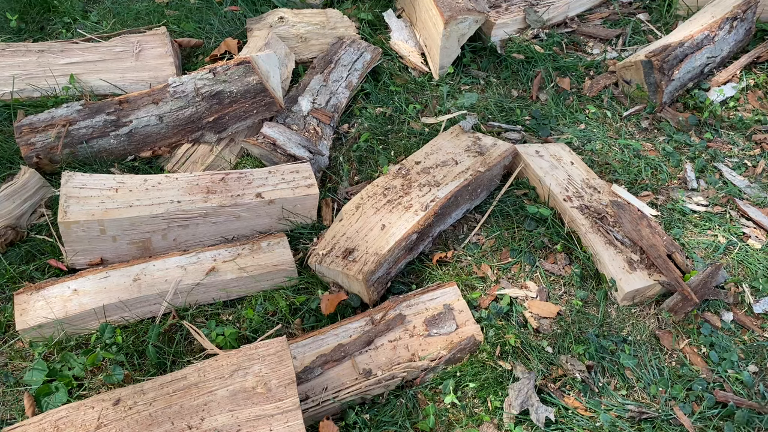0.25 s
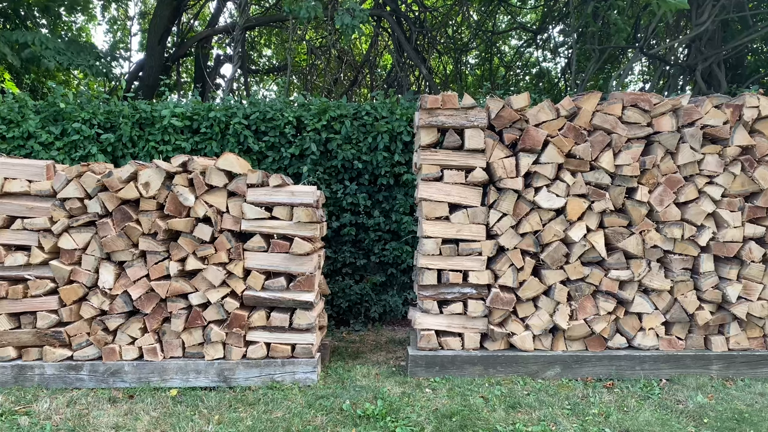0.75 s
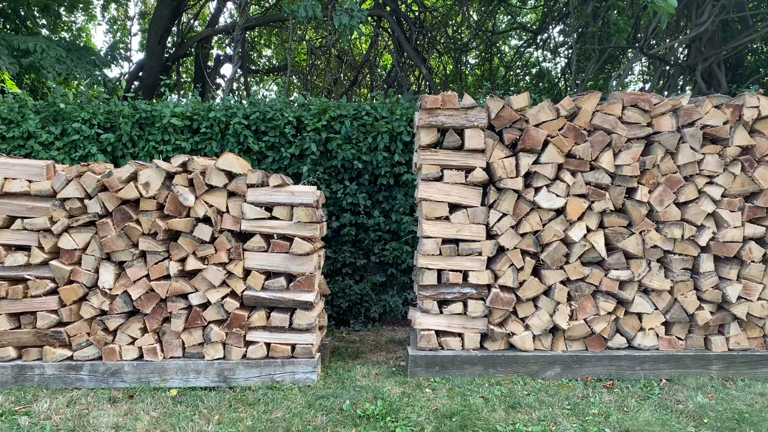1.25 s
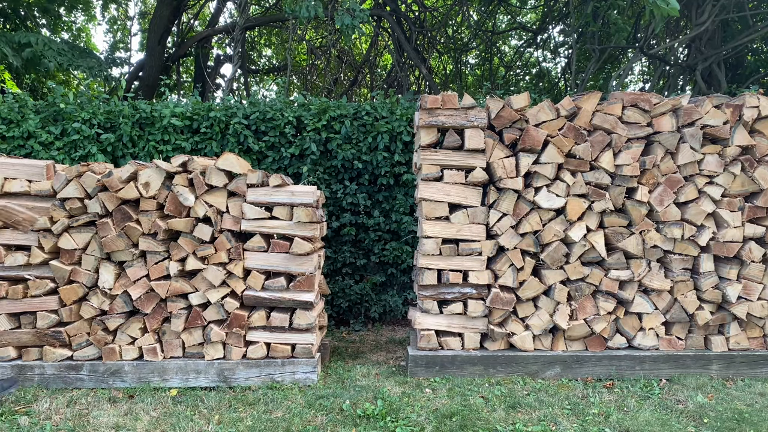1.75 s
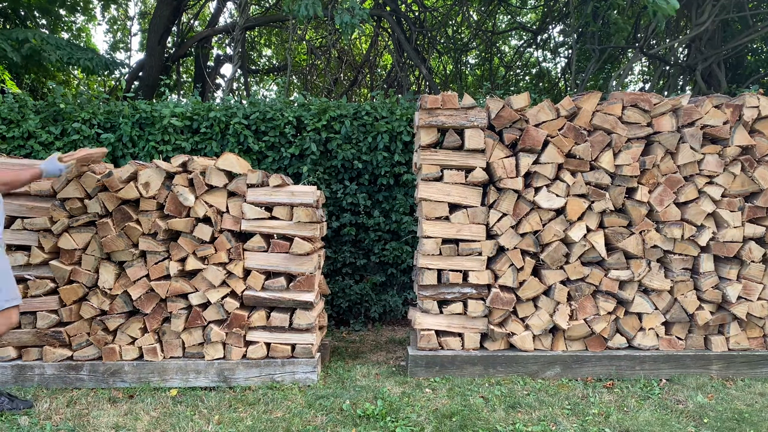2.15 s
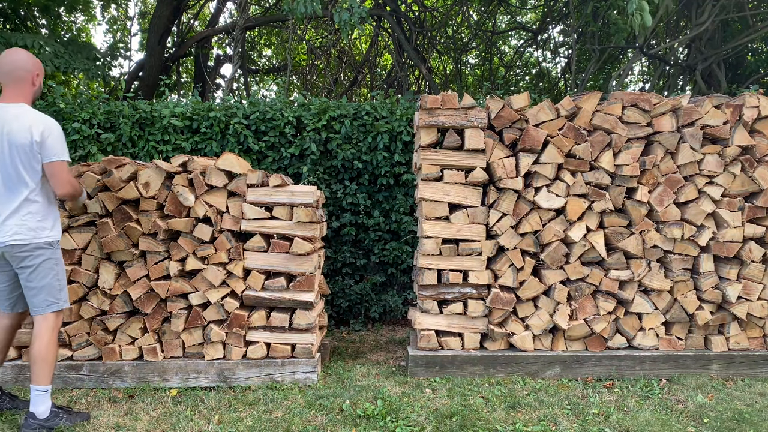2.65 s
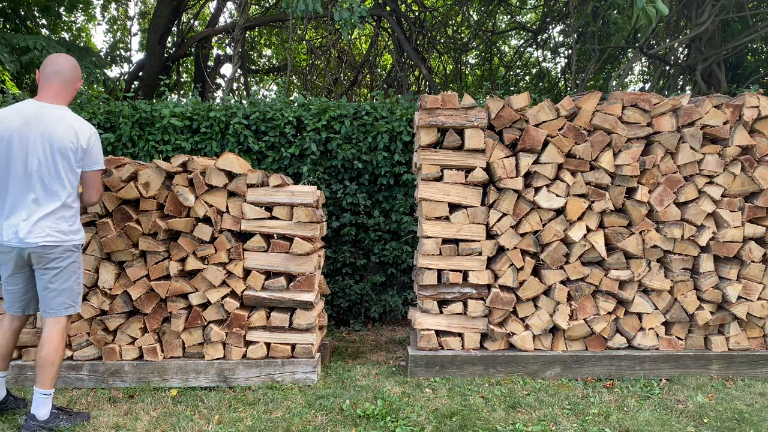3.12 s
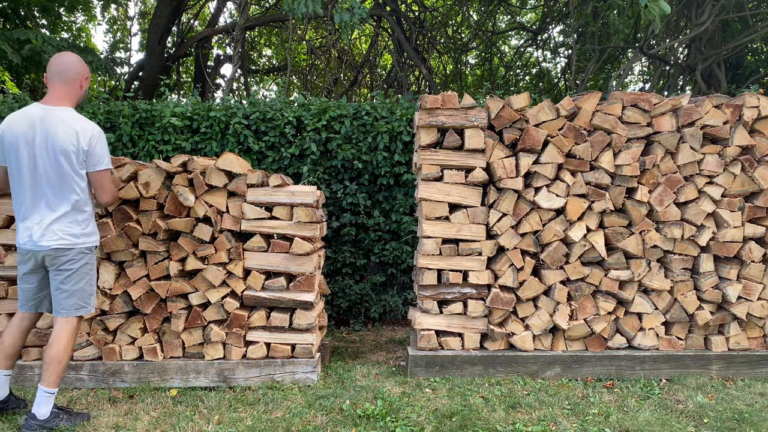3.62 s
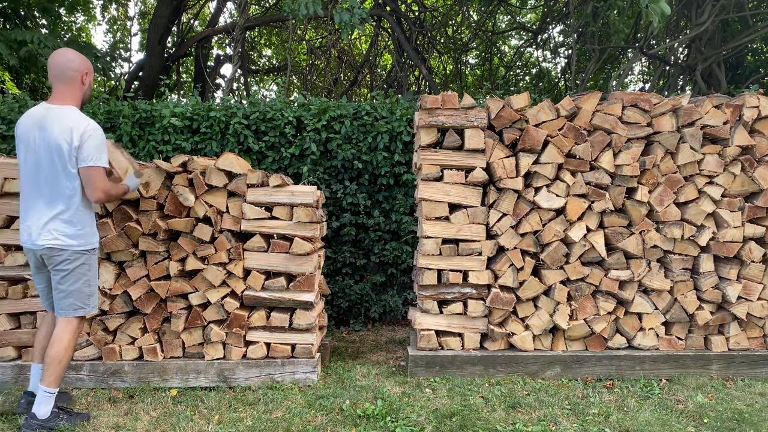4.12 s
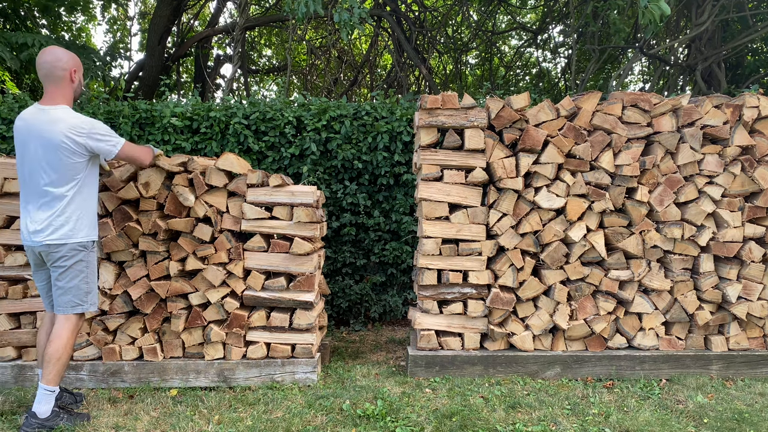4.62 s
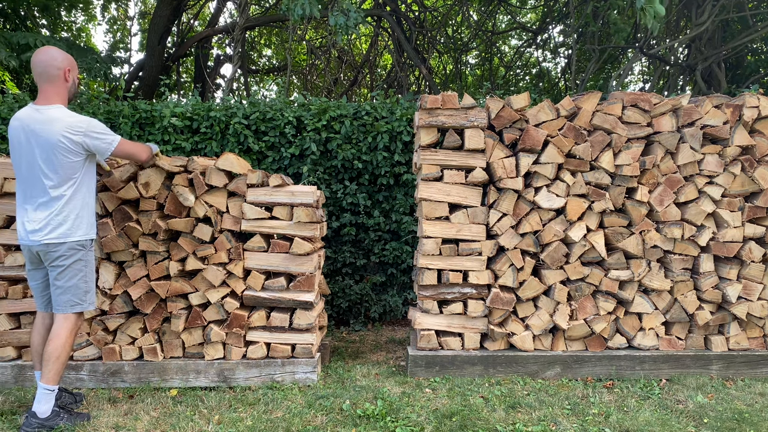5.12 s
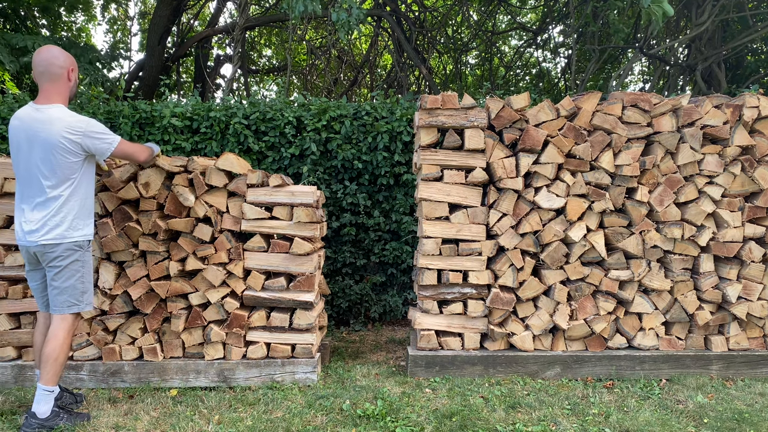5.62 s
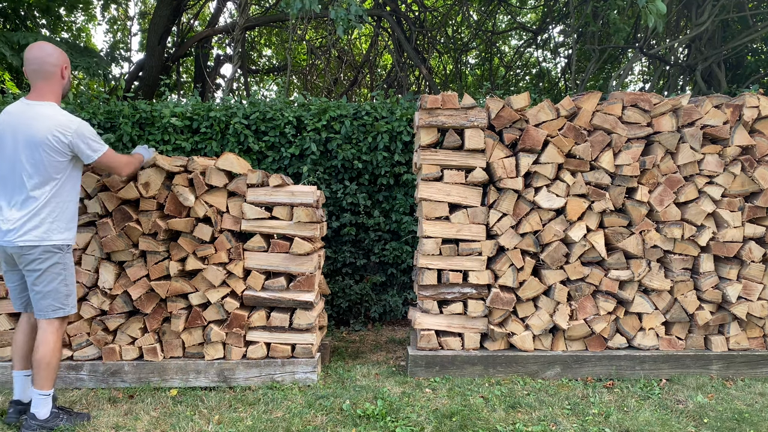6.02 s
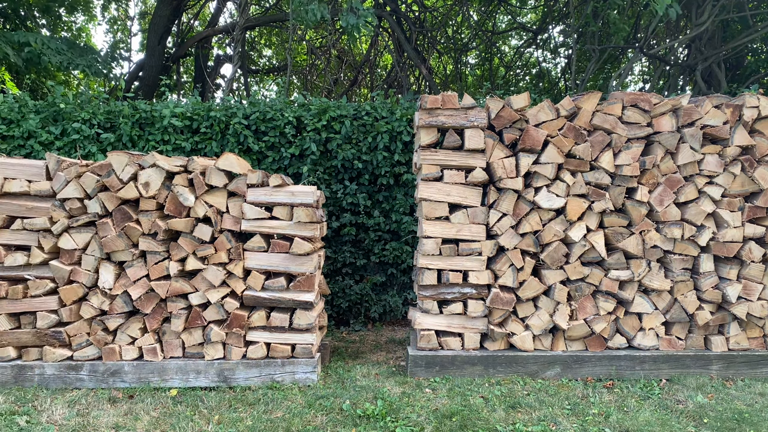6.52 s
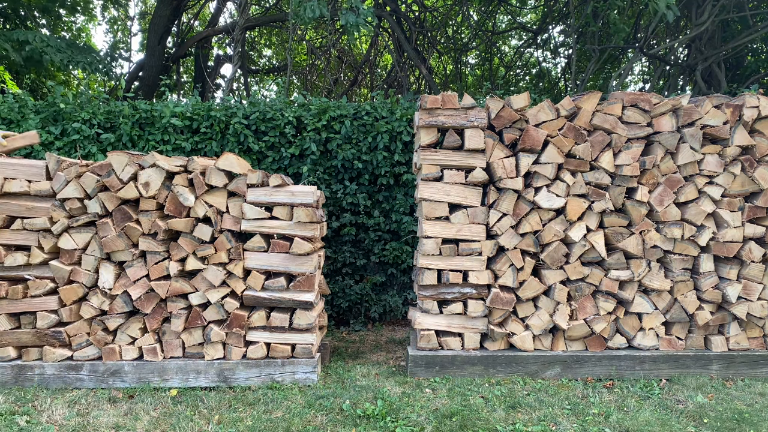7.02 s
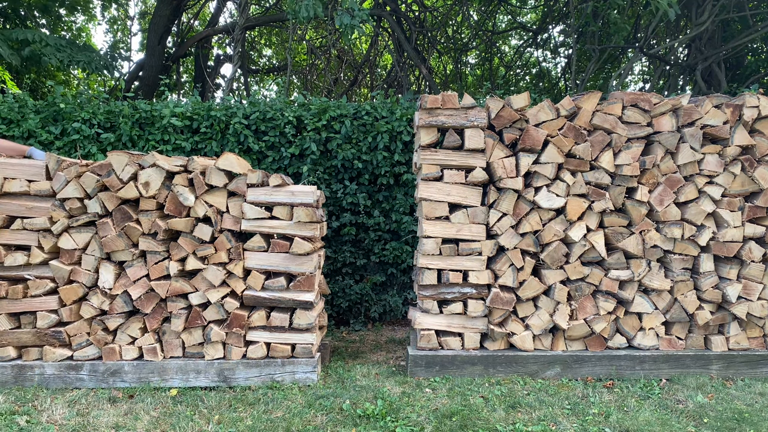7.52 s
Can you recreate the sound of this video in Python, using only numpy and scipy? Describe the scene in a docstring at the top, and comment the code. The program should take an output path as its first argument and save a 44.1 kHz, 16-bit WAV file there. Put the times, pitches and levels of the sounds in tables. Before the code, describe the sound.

Dull bumps and rubbing sound right at the microphone. A quiet garden follows, with crickets chirping, a far engine droning, traffic passing in the distance and a bird giving thin, falling cries. A split log taps onto a woodpile, and later another lands with a sharper knock and a small clatter. The insects and background rumble then grow louder, and a quick run of deep thuds comes near the end.

```python
"""A late-summer garden where firewood is stacked, heard in three stretches joined by short fades.
First come dull bumps and rubbing close to the microphone, then split logs that ring briefly as they
knock onto the stack, then low thuds. Behind it all, insects chirp and buzz with their wings, leaves
stir, a bird gives falling cries, a far engine drones and distant traffic rushes by."""
import sys
import numpy as np
from scipy import signal
from scipy.fft import rfft, irfft, next_fast_len
from scipy.io import wavfile
from scipy.ndimage import uniform_filter1d, map_coordinates

SR = 44100
rng = np.random.default_rng(int(sys.argv[2]) if len(sys.argv) > 2 else 0)


def waveform_to_disk(signal):
    """Save audio, clipped to [-1, 1], as 16-bit WAV at the path in sys.argv[1]."""
    frames = np.transpose(np.atleast_2d(signal))
    scaled = np.clip(frames, -1, 1) * 32767
    samples = np.round(scaled).astype(np.int16)
    wavfile.write(sys.argv[1], SR, samples)


N = 342127
T = np.arange(N) / SR

# the joins between the stretches: t/s, fade-out/s, fade-in/s
JOINS = [(0.555, 0.042, 0.035), (6.12, 0.042, 0.17)]
# tone colour of tyres roaring on a road: f/Hz, level/dB
TYRE_ROAR = [(300, -30), (550, -9.5), (800, -2.5), (1050, 2.5), (1400, -6), (2000, -48), (3500, -69)]


def amp(db):
    """Turn decibels into a factor to multiply by."""
    return 10 ** (np.asarray(db) / 20)


def unit(x):
    """Scale a sound to an average strength (rms) of 1."""
    return x / np.sqrt(np.mean(x ** 2) + 1e-20)


def along(points, hz):
    """Read between (frequency, value) points, with octaves evenly spaced."""
    f, v = np.transpose(points)
    return np.interp(np.log(hz + 1), np.log(f + 1), v)


def wobble(rate):
    """A smooth curve through `rate` random values a second."""
    return map_coordinates(rng.standard_normal(int(N * rate / SR) + 4), [T * rate])


def swell(s, rise, hold, release):
    """A curve that rises from 0 to 1 at time s, holds, then falls back."""
    return np.clip(np.minimum((T - s) / rise, 1 - (T - s - rise - hold) / release), 0, 1)


def stretch():
    """Which stretch (0, 1 or 2) each sample belongs to."""
    return np.searchsorted([join[0] for join in JOINS], T)


def add(track, s, sound):
    """Mix a sound into a track at time s."""
    part = track[..., max(round(s * SR), 0):][..., :sound.shape[-1]]
    part += sound[..., :part.shape[-1]]


def filtered(x, response):
    """Change the strength and timing of each frequency in x by response(hz)."""
    size = next_fast_len(x.shape[-1] + 8192)
    return irfft(rfft(x, size) * response(np.fft.rfftfreq(size, 1 / SR)), size)[..., :x.shape[-1]]


def placed(x, lead_ms, pan_db=0):
    """A sound from the left reaches the left channel earlier and louder."""
    side = np.array([[.5], [-.5]])
    return amp(side * pan_db) * filtered(x, lambda hz: np.exp(2j * np.pi * hz * lead_ms / 1000 * side))


def rush(colour, alike, patchy_db=1):
    """Stereo noise of strength 1 with louder and softer patches; alike=1 makes both sides the same."""
    noise = signal.stft(rng.standard_normal((2, N)), nperseg=512)[2]
    patches = uniform_filter1d(rng.standard_normal(noise.shape[1:]), size=5, axis=0)
    patches = uniform_filter1d(patches, size=14, axis=1)
    pair = signal.istft(noise * amp(patchy_db * unit(patches)), nperseg=512)[1][:, :N]
    mid, side = filtered(pair, lambda hz: amp(along(colour, hz)))
    turn = np.arccos(np.clip(alike, -1, 1)) / 2
    return unit(np.cos(turn) * mid + np.sin(turn) * np.array([side, -side]))


def echo(x):
    """Hedge, trees and woodpile scatter a sound into a short, soft tail."""
    # how long the garden echoes: f/Hz, time to fade by 60 dB/s
    fade_times = [(200, 0.51), (1000, 0.37), (4000, 0.69), (12000, 0.032)]
    hz, t, noise = signal.stft(rng.standard_normal((2, SR // 2)), SR, nperseg=256)
    tail = signal.istft(noise * amp(-60 * t / along(fade_times, hz)[:, None]), SR, nperseg=256)[1]
    return signal.fftconvolve(x[None], tail / np.linalg.norm(tail[0]), axes=1)[:, :N]


def traffic():
    """Distant vehicles swell as they near and fade as they leave; gives their murmur and tyre noise."""
    # vehicles going by: t when nearest/s, half-width/s, murmur/dB, roar/dB, swish/dB
    passes = [(0.65, 0.7, -50, -47.5, -49.5), (1.88, 1, -48.5, -50.5, -51.5),
              (2.9, 0.55, -49, -48.5, -61.5), (3.85, 1, -90, -78, -53.5)]
    # tone colours of the low murmur and the tyres' swish: f/Hz, level/dB
    murmur_colour = [(90, -13), (130, 6.5), (170, 4), (240, -1), (300, -12.5), (450, -24.5), (800, -27),
                     (1500, -73)]
    swish_colour = [(700, -12), (1250, 2.5), (1700, 1.5), (2200, -4), (2800, -11.5), (4000, -51)]
    falloff = 2.67  # how steeply the sound falls with distance
    power = amp([[-60.5], [-56.5], [-63.5]]) ** 2  # steady murmur, roar and swish from farther off
    for s, width, murmur_db, roar_db, swish_db in passes:
        distance = np.hypot(1, (T - s) / width)
        power = power + (amp([[murmur_db], [roar_db], [swish_db]]) / distance ** falloff) ** 2
    murmur_gain, roar_gain, swish_gain = np.sqrt(power)
    murmur = murmur_gain * rush(murmur_colour, alike=0.92)
    roar = roar_gain * rush(TYRE_ROAR, alike=0.85, patchy_db=1.5)
    swish = swish_gain * rush(swish_colour, alike=0.76, patchy_db=0.94)
    return murmur, roar + swish


def engine():
    """A far engine's firing makes a low drone, louder when it works harder."""
    # spells of hard work: t/s, rise/s, hold/s, release/s, level above idle/dB
    loads = [(1.238, 0.11, 0.18, 0.24, 10), (1.7, 0.25, 0.79, 1.26, 8.5)]
    idle_db, firing_hz = -52, 109.3
    load_db = np.max([db * swell(*timing) for *timing, db in loads], axis=0)
    phase = 2 * np.pi * np.cumsum(firing_hz + 1.47 * wobble(14)) / SR
    shaft_tone = amp(-21) * wobble(25) * np.sin(1.5 * phase)
    return amp(idle_db + load_db + 1.1 * wobble(14)) * unit(np.sin(phase) + shaft_tone)


def garden_air():
    """The middle stretch: rumble and hiss slowly grow quieter, with engine and traffic to the left."""
    # tone colours of the open air: f/Hz, level/dB
    rumble_colour = [(20, -15), (38, -5.5), (55, 8), (80, 5), (110, 3), (160, -25), (300, -73)]
    hiss_colour = [(250, 13.5), (500, 8), (1200, -20), (3000, -0.5), (5000, -1.5), (8000, -34),
                   (11000, -5.5), (15500, -48)]
    calm_db = -0.42 * T
    drone = engine()
    rumble = amp(-49.5 + calm_db) * rush(rumble_colour, alike=1)
    murmur, tyres = traffic()
    hiss = amp(-57.5 + calm_db) * rush(hiss_colour, alike=0.13, patchy_db=1.5)
    low = placed(drone + rumble + murmur, lead_ms=0.36, pan_db=-1)
    return low + placed(tyres, lead_ms=0.45, pan_db=-.5) + hiss


def late_air():
    """The last stretch: a louder, steady rumble and murmur, with far tyres."""
    # tone colours of the louder air: f/Hz, level/dB
    rumble_colour = [(15, -41), (25, -15), (53, 3.5), (70, 5), (114, 3), (140, -10.5), (227, -15),
                     (300, -25), (390, -58), (660, -120)]
    murmur_colour = [(88, -4), (150, -5), (221, -6), (415, -9), (1000, -17), (1670, -20.5), (3960, -20),
                     (5640, -22.5), (6000, -29), (7800, -42), (13200, -120)]
    rumble = amp(-36.5) * rush(rumble_colour, alike=0.94)
    murmur = amp(-44.5) * rush(murmur_colour, alike=0.058, patchy_db=2.5)
    tyres = amp(-54) * placed(rush(TYRE_ROAR, alike=0.96), lead_ms=0.35)
    return rumble + murmur + tyres


def whines():
    """Faint, fuzzy tones swell out of the traffic and sink back."""
    # narrow bands of noise: t/s, half-width/s, f/Hz, spread/Hz, level/dB
    bands = [(1.86, .17, 980, 35, -45), (3.0, 0.19, 803, 55, -52), (3.66, 0.2, 1980, 150, -62)]
    tones = np.zeros(N)
    for s, width, hz, spread, db in bands:
        band = filtered(rng.standard_normal(N), lambda f: np.exp(-.5 * ((f - hz) / spread) ** 2))
        tones += amp(db) * np.exp(-((T - s) / width) ** 2) * unit(band)
    return placed(tones, lead_ms=0.45)


def leaves():
    """Grass and leaves stir in soft swishes; a faint, very high crackle comes and goes in clumps."""
    # tone colour of the swishes and the crackle: f/Hz, level/dB
    colour = [(2000, 14.5), (5000, -42), (11000, 23.5), (15500, 4.5)]
    # single swishes: t/s, half-width/s, level/dB
    swishes = [(0.47, 0.028, -47.5), (0.82, .07, -71), (2.33, 0.13, -71), (2.94, 0.057, -69),
               (4.15, 0.11, -73), (6.59, 0.053, -50.5), (6.69, 0.035, -56), (6.86, 0.05, -46)]
    # steady stirring in each stretch: level/dB
    stir_db = [-58.5, -77, -58]
    power = amp(stir_db)[stretch()] ** 2
    power += sum(amp(db) ** 2 * np.exp(-((T - s) / width) ** 2) for s, width, db in swishes)
    swish = np.sqrt(power) * amp(1.6 * wobble(150)) * rush(colour, alike=0.073)
    clicks_per_s = 45 * amp(6.5 * wobble(3.7))
    clicks = (rng.random(N) < clicks_per_s / SR) * rng.exponential(1, N) ** .5
    t = np.arange(SR // 25) / SR
    click_shape = amp(-60 * t / 0.068) * (1 - np.exp(-t / .002))
    crackle = signal.fftconvolve(clicks, click_shape)[:N]
    return swish + amp(-84.5) * unit(crackle * rush(colour, alike=0.14))


def chirps(runs, half_width_s):
    """The loudness of a cricket that chirps about four times a second and may speed up."""
    loudness = np.zeros(N)
    for s, end, gap, shortening in runs:
        while s < end:
            loudness += amp(rng.normal(0, 1)) * np.exp(-((T - s) / half_width_s) ** 4)
            s, gap = s + gap, gap - shortening
    return loudness


def crickets():
    """Two crickets, one high and one lower, chirp in and out of step."""
    # runs of chirps: first t/s, end t/s, time between chirps/s, its shortening per chirp/s
    high_runs = [(0.61, 6.0, 0.2534, 0.00122), (6.25, 7.7, 0.262, 0)]
    low_runs = [(0.72, 6.0, 0.2715, 0), (6.23, 7.8, 0.285, 0)]
    # tone colour of the lower cricket: f/Hz, level/dB
    low_colour = [(5750, -31), (6000, -1), (6130, 7), (6240, -6), (6450, -51)]
    high_gain = amp(-6 + 4.2 * wobble(60)) * chirps(high_runs, half_width_s=0.057)
    high_hz = 6641 + 16 * wobble(150)
    high = high_gain * np.sin(2 * np.pi * np.cumsum(high_hz) / SR)
    low = amp(-17) * chirps(low_runs, half_width_s=0.073) * rush(low_colour, alike=0.93)
    return high, low


def fast_singer():
    """An insect pulses quickly; its pitch sags through each wing stroke."""
    # wing strokes in each stretch: rate/Hz, first t/s
    strokes = [(13.72, 0.048), (13.722, 0.558), (13.54, 6.1163)]
    rate, first_s = np.array(strokes)[stretch()].T
    stroke = ((T - first_s) * rate + .5) % 1 - .5  # runs from -0.5 to 0.5 in each stroke
    pitch_hz = 7520 - 330 * stroke + 35 * wobble(250)
    pulses = amp(0.5 + 1.5 * wobble(9)) * np.cos(np.pi * stroke) ** 4
    return pulses * np.sin(2 * np.pi * np.cumsum(pitch_hz) / SR)


def insects():
    """A steady, shrill chorus with the fast singer and the two crickets in it."""
    # tone colour of the chorus: f/Hz, level/dB
    chorus_colour = [(5700, -20), (6120, -13), (6300, -16), (6500, -2), (6800, -3.5), (7100, 1),
                     (7500, -1.5), (7700, -8), (8100, -3), (8450, -22.5), (9000, -78)]
    # all these insects in each stretch: level/dB
    stretch_db = [-57, -54.5, -40.5]
    # left and right hear them slightly out of step: f/Hz, left's lead/radians
    left_lead = [(6400, 1), (7000, -0.34), (7500, -0.59), (8000, -2.17)]
    chorus = amp(-1.58) * rush(chorus_colour, alike=0.89)
    singer = fast_singer()
    high, low = crickets()
    shrill = amp(stretch_db)[stretch()] * (chorus + singer + high + low + amp(-9) * echo(singer + high))
    return filtered(shrill, lambda hz: np.exp(1j * along(left_lead, hz) * np.array([[.5], [-.5]])))


def bush_cricket():
    """A thin, very high sizzle: now pulsing, now an even buzz."""
    # spells of song: t/s, hold/s, level/dB, depth of pulsing (0-1)
    songs = [(0.58, 2.9, -72, 0.1), (3.951, 2.1, -71.5, 0), (6.167, 0.66, -53.5, 0.4)]
    # tone colour of the sizzle: f/Hz, level/dB
    sizzle_colour = [(11500, -40), (13500, -27), (14500, 14), (15800, 3)]
    pulses_per_s = 12.7 + 0.83 * wobble(5)
    pulse = np.sin(np.pi * np.cumsum(pulses_per_s) / SR) ** 2
    gain = sum(amp(db) * swell(s, rise=0.046, hold=hold, release=0.75) * (1 - depth * pulse)
               for s, hold, db, depth in songs)
    return gain * rush(sizzle_colour, alike=0.15)


def bird():
    """Thin cries that swell, break once and fall to a hoarse end; the throat adds a lower voice midway."""
    # cries: t/s, length/s, level/dB, pitch ratio, sag (share of pitch), start/dB, lower voice/dB,
    # top overtone/dB, moment of the break (share of length)
    cries = [(1.465, 0.36, -48, 0.974, .1, -16, -28, -19, 0.27),
             (2.311, 0.35, -54.5, 0.995, .11, -11, -18, -16, 0.4),
             (3.746, 0.36, -55, 0.985, .125, -6, -24, -18, 0.4),
             (6.657, .365, -38.5, 1.008, .125, -16, -10, -12.5, 0.58),
             (7.258, 0.375, -39, 1.008, .125, -11, -20, -13, 0.62)]
    # the main overtones: multiple of the base pitch, level/dB, fuzz/radians
    overtones = [(3, -12, .5), (4, 0, .2)]
    base_hz, waver, flutter_db = 922, .003, 1.9
    voice = np.zeros(N)
    for s, length, db, ratio, sag, start_db, lower_db, top_db, break_at in cries:
        progress = (T - s) / length
        on = (progress > 0) & (progress < 1)
        progress = progress[on]
        # the pitch scoops up, then sags ever faster
        pitch_hz = ratio * base_hz * (1 - 0.05 * np.exp(-progress / 0.08) - sag * progress ** 1.5)
        shape_db = np.interp(progress, [0, 0.7, 1], [start_db, 0, -10])
        break_db = -13 * np.exp(-((progress - break_at) * length / .019) ** 2)
        fade_in = 1 - np.exp(-progress * length / .008)
        hoarse = (waver + .045 * progress ** 6) * wobble(500)[on]
        phase = 2 * np.pi * np.cumsum(pitch_hz * (1 + hoarse + waver * wobble(55)[on])) / SR
        tone = sum(amp(level + flutter_db * wobble(85)[on]) * np.sin(k * phase + fuzz * wobble(220)[on])
                   for k, level, fuzz in overtones + [(6, top_db, .8)])
        lower = amp(lower_db) * np.exp(-((progress - .58) / 0.24) ** 2) * np.sin(1.85 * phase)
        voice[on] += amp(db) * (fade_in * amp(shape_db + break_db) * tone + lower)
    return amp(-2) * placed(voice, lead_ms=-0.0095, pan_db=5.5) + amp(-9) * echo(voice)


def close_rustle():
    """Strokes right at the microphone rumble and rub over a steady hiss."""
    # rubbing strokes: t/s, hold/s, rise in rumble/dB
    strokes = [(-0.01, 0.22, 7.5), (0.286, 0.082, 4.5)]
    # tone colours of the rustle's three parts: f/Hz, level/dB
    rumble_colour = [(18, -15), (30, 6.5), (60, 3.5), (140, -1), (250, -6), (360, -13.5), (520, -23),
                     (900, -81)]
    rub_colour = [(200, -26), (400, 5), (600, -1), (850, -3), (1100, -9), (1400, -16), (2200, -30),
                  (4000, -57)]
    hiss_colour = [(1000, 0.5), (2000, 2), (4500, 2.5), (7000, -3), (11000, -24), (15500, -8.5)]
    push_db = sum(db * swell(s, rise=0.014, hold=hold, release=0.079) for s, hold, db in strokes)
    rumble = amp(-29 + push_db) * rush(rumble_colour, alike=0.91)
    rub = amp(-51 + 2.34 * push_db + 2.3 * wobble(116.6)) * rush(rub_colour, alike=-0.14)
    return amp([[-.6], [.6]]) * (rumble + rub) + amp(-46.5) * rush(hiss_colour, alike=0.1)


def swing(hz, fade_s):
    """A low vibration that starts softly and falls by 60 dB in fade_s."""
    t = np.arange(SR // 4) / SR
    return amp(-60 * t / fade_s) * np.sin(2 * np.pi * hz * t) * (1 - np.exp(-t / 0.0017))


def scuffs(contacts):
    """A brief, dull scrape at each contact (t/s, level/dB)."""
    t = np.arange(SR // 4) / SR
    loudness = np.zeros(N)
    for s, db in contacts:
        add(loudness, s, amp(db - 60 * t / 0.024) * (1 - np.exp(-t / 0.00089)))
    colour = [(150, -12), (400, 10), (950, 4.5), (1400, -12), (2500, -24), (6000, -59)]
    return loudness * rush(colour, alike=-0.1)


def bumps():
    """Soft contacts, each a few low swings and a scuff. Most come close to the microphone at the start; the
    last is a higher knock among the late thuds."""
    # dull bumps: t/s, level/dB, f/Hz, scuff relative to level/dB
    contacts = [(0.031, -17.5, 258, 2), (0.047, -17.5, 360, 7), (0.055, -1, 257, -15),
                (0.0611, -3, 245, -13), (0.072, -13, 108, -13), (0.083, -12.5, 333, -3.5),
                (0.0916, -7, 192, -11), (0.11, -12, 170, -4.5), (0.143, -9.5, 390, -2.5),
                (0.154, -4.5, 280, -7.5), (0.161, -13.5, 184, -6), (0.171, -9, 396, -1),
                (0.18, -11.5, 92.5, -23), (0.196, -6.5, 695, -4.5), (0.212, -20, 105, -2),
                (0.2146, -6.5, 115, -13), (0.268, -18.5, 625, -3), (0.352, -7.5, 149, -15),
                (0.3603, -11, 870, -6.5), (0.3635, -3, 300, -13.5), (0.376, -22.5, 420, -3),
                (0.384, -22, 480, -6), (0.407, -29, 380, -6), (0.425, -18.5, 112, -13),
                (0.488, -21, 158, -12.5), (7.476, -27.5, 343, -14)]
    swings_to_fade = 5.4
    swings = np.zeros(N)
    for s, db, hz, _ in contacts:
        add(swings, s, amp(db) * swing(hz, fade_s=swings_to_fade / hz))
    scrapes = scuffs([(s, db + scuff_db) for s, db, _, scuff_db in contacts])
    return amp(4.5) * placed(swings, lead_ms=-0.18, pan_db=-1) + scrapes


def thuds():
    """Deep thuds off to one side, each mixing a deep and a higher tone in its own balance."""
    # hits: t/s, level/dB, upper tone relative to level/dB, scuff relative to level/dB
    hits = [(7.183, -38, 17, -30), (7.202, -16, -2.5, -29), (7.218, -16, -5, -43), (7.268, -22, 12.5, -30),
            (7.291, -11, -20, -35), (7.318, -10.5, 0, -32), (7.388, -13.5, -23, -32),
            (7.477, -18, -28, -19)]
    deep, upper = swing(hz=61.7, fade_s=0.16), swing(hz=127.4, fade_s=0.068)
    swings = np.zeros(N)
    for s, db, upper_db, _ in hits:
        add(swings, s, amp(db) * (deep + amp(upper_db) * upper))
    scrapes = scuffs([(s, db + scuff_db) for s, db, _, scuff_db in hits])
    return amp(1) * placed(swings, lead_ms=-0.79, pan_db=2.5) + scrapes


def twigs():
    """Bark and twigs give way with small, dry ticks."""
    # ticks: t/s, level/dB
    ticks = [(0.401, -14), (0.414, -14), (2.138, -55), (3.669, -38), (4.576, -21), (4.583, -30),
             (7.472, -21)]
    t = np.arange(SR // 16) / SR
    tick_shape = amp(-21.5 - 60 * t / 0.016) * (1 - np.exp(-t / .002))
    track = np.zeros(N)
    for s, db in ticks:
        add(track, s, amp(db) * tick_shape * rng.standard_normal(len(t)))
    colour = [(800, -26), (3000, 10.5), (6500, 17), (15000, 1)]
    track = filtered(track, lambda hz: amp(along(colour, hz)))
    return track + amp(-3.5) * echo(track)


def log_ring(t, ratio, dull_db):
    """A struck log rings with several tones; neighbouring ones swing opposite ways at the struck end."""
    # the tones of a split log: f/Hz, level/dB, time to fade by 60 dB/s
    tones = [(280, -13, 0.036), (415, -12.5, 0.085), (543, -9.5, 0.035), (655, -10.5, 0.04),
             (850, -24, .07), (1035, 0, 0.047), (1470, -7.5, 0.034), (1920, -21, .055), (2700, -29, .04)]
    pivot_hz = 1043  # a dull knock is weaker above this and stronger below
    ring = np.zeros(len(t))
    for k, (hz, db, fade_s) in enumerate(tones):
        start_db = db - dull_db * np.log2(hz / pivot_hz) + rng.normal(0, 1)
        ring += (-1) ** k * amp(start_db - 60 * t / fade_s) * np.sin(2 * np.pi * hz * ratio * t)
    return ring


def settling_pile():
    """Pieces of different sizes chatter under the last log, ever more softly."""
    start_s, length_s, count = 4.594, 0.11, 18
    first_db, fall_db = -44, 13
    t = np.arange(SR // 4) / SR
    pile = np.zeros((2, N))
    for k, (when, size, side) in enumerate(rng.random((count, 3))):
        progress = (k + when) / count
        ring = log_ring(t, ratio=2 ** (size - .5), dull_db=3.5)
        contact = amp(first_db - fall_db * progress) * (1 - np.exp(-t / .001)) * ring
        add(pile, start_s + progress * length_s, np.sqrt([[side], [1 - side]]) * contact)
    return pile


def logs():
    """Each knock on the stack scrapes the bark and rings the log, while the hand's grip deadens it."""
    # knocks: t/s, level/dB, pitch ratio, scrape/dB, dullness/(dB per octave), grip/(dB per s)
    knocks = [(2.5162, -32, 1.1, -13, 8, 350), (2.5222, -29.5, 1.12, -17, 3, 800),
              (4.5561, -32.5, 1.05, -19, 3.5, 100), (4.562, -36, 1.0, -20, 6, 200),
              (4.5763, -15.3, 1.012, -22, .7, 100), (4.5818, -27.5, 0.86, -11, 7, 400),
              (4.5985, -37, 1.0, -7, 4, 200), (4.612, -44, .95, -14, 9, 0)]
    t = np.arange(SR // 4) / SR
    wood, bark = np.zeros(N), np.zeros((2, N))
    for s, db, ratio, scrape_db, dull_db, grip in knocks:
        press = amp(db - grip * t) * (1 - np.exp(-t / .0014))
        add(wood, s, press * log_ring(t, ratio, dull_db))
        add(bark, s, press * amp(scrape_db - 60 * t / 0.046) * rng.standard_normal((2, len(t))))
    bark_colour = [(500, 15), (2200, 9), (4500, 0.5), (8000, -10), (15000, -5)]
    bark = filtered(bark, lambda hz: amp(along(bark_colour, hz)))
    direct = placed(wood, lead_ms=0.22, pan_db=-1.5) + bark
    return direct + settling_pile() + amp(-20) * echo(wood + bark[0])


def scene():
    """Each stretch has its own background; everything fades out and back in at the joins."""
    air = np.choose(stretch(), [close_rustle(), garden_air(), late_air()])
    dips = [np.clip(np.maximum((s - T) / out, (T - s) / back), 0, 1) for s, out, back in JOINS]
    fades = np.maximum(np.sin(np.pi / 2 * np.prod(dips, axis=0)) ** 1.2, .03)
    garden = air + whines() + leaves() + insects() + bush_cricket() + bird()
    return fades * (garden + logs() + bumps() + thuds() + twigs())


def record(dry):
    """The microphone loses the deepest bass and the very highest treble."""
    top_hz = 15850
    bass_cut = [(14, -32), (25, -20), (32, -2.5), (42, 1)]  # f/Hz, level/dB
    return filtered(dry, lambda hz: (hz < top_hz) * amp(along(bass_cut, hz)))


dry = scene()
out = record(dry)
waveform_to_disk(out)
```